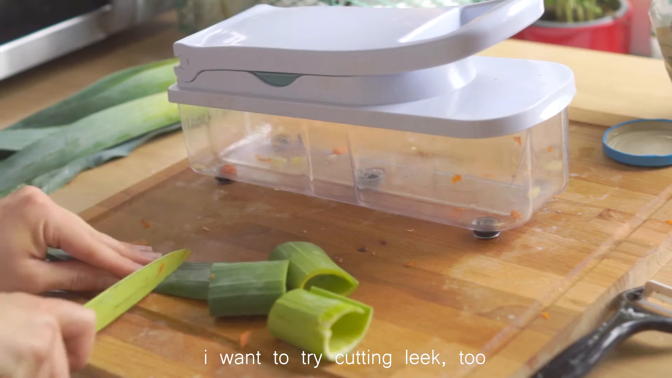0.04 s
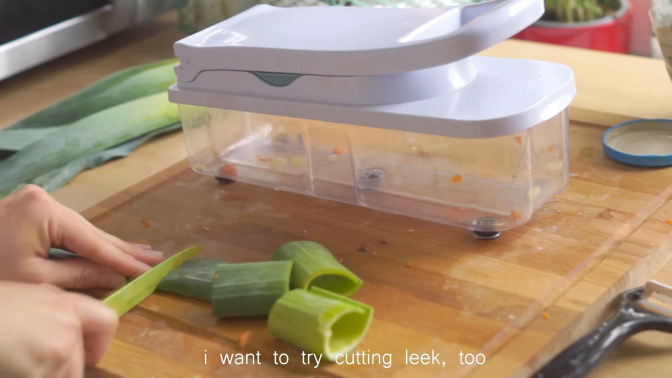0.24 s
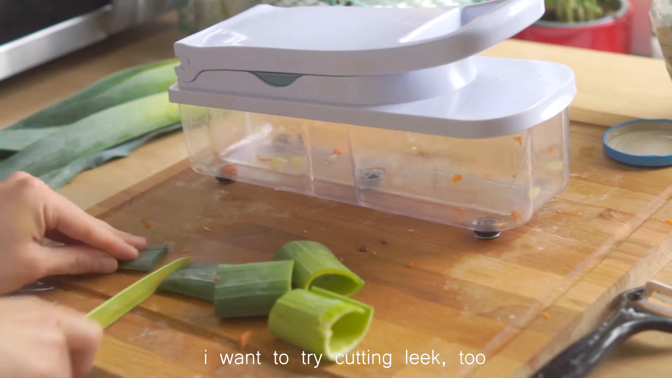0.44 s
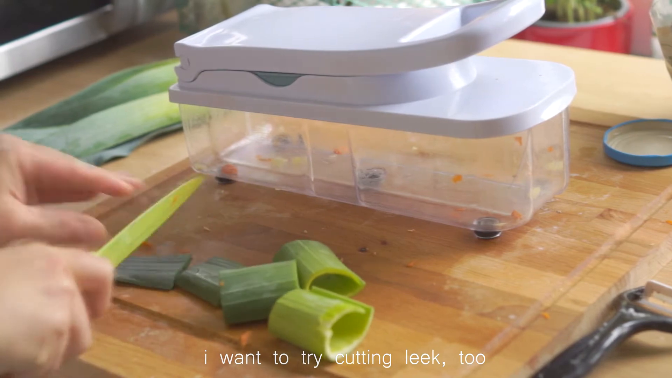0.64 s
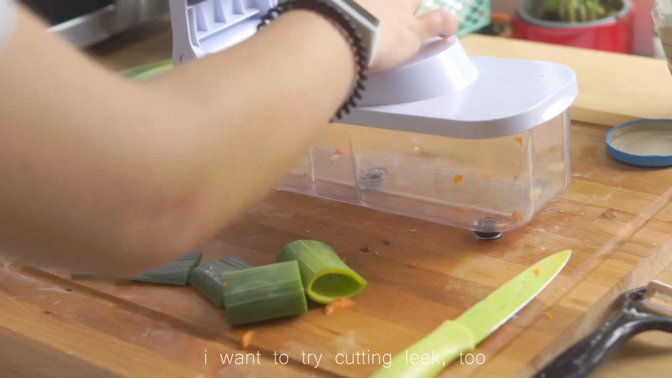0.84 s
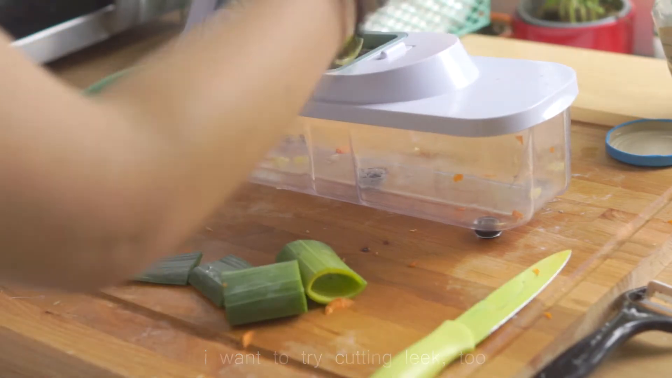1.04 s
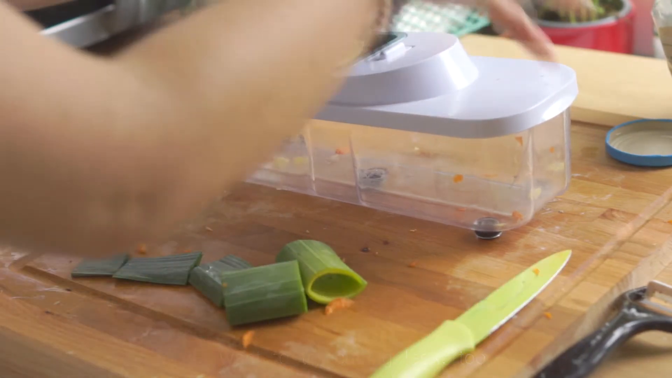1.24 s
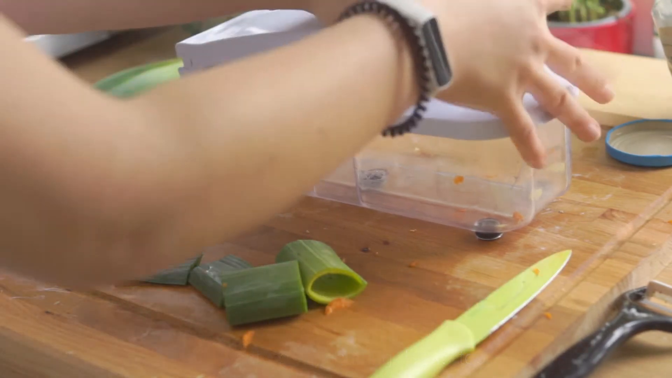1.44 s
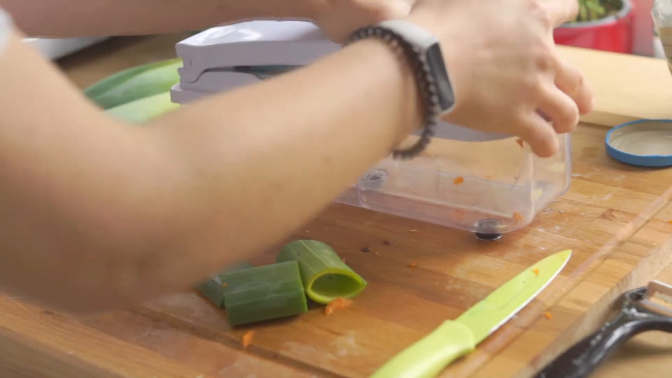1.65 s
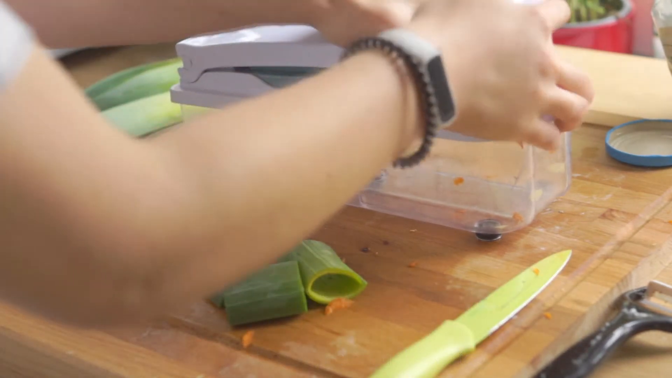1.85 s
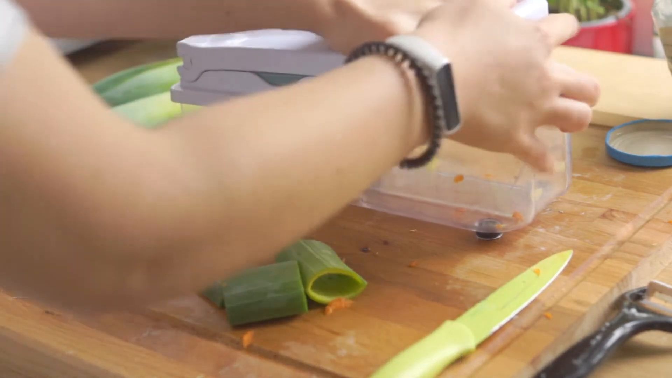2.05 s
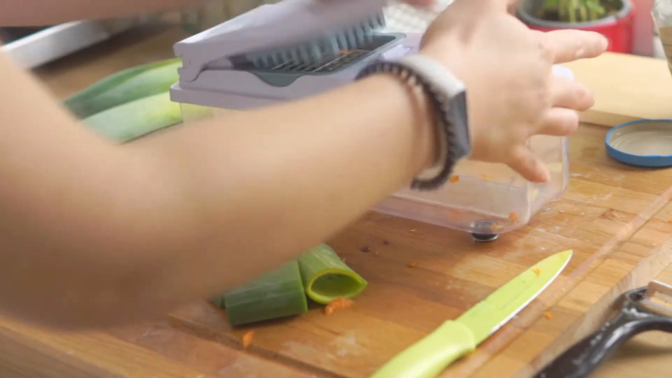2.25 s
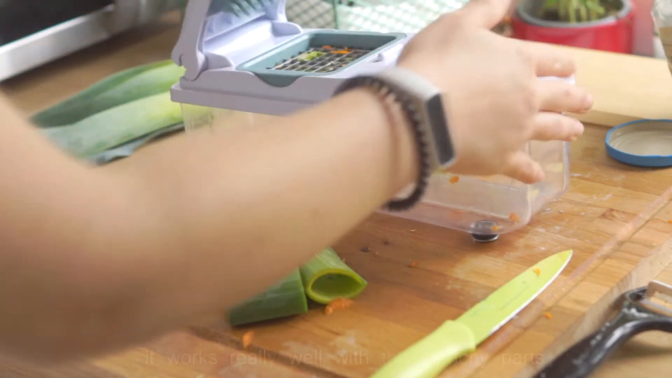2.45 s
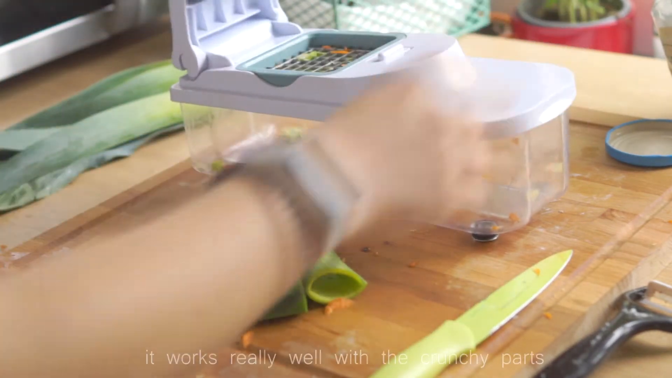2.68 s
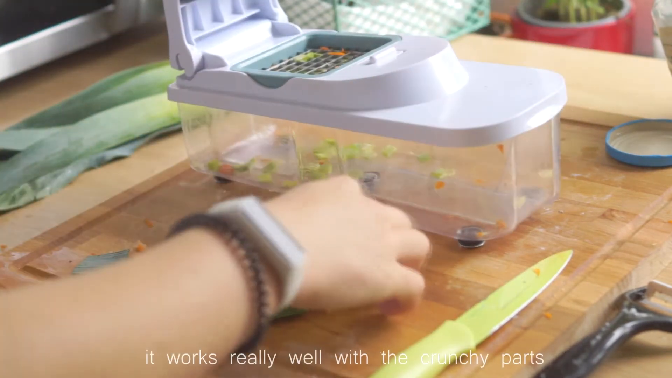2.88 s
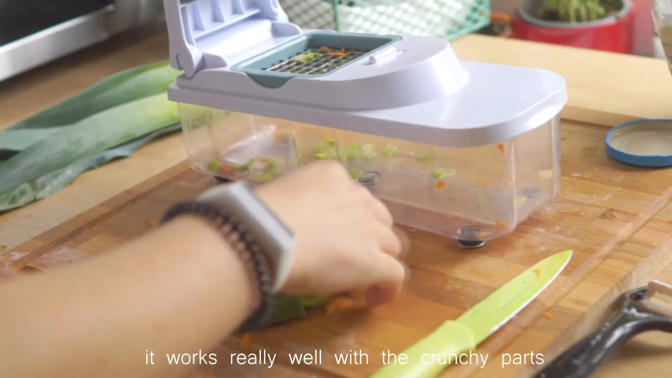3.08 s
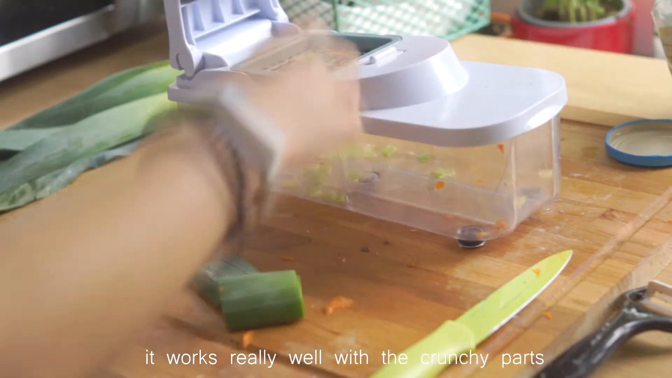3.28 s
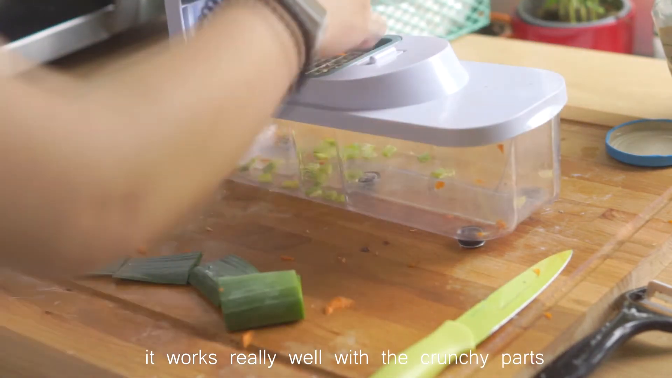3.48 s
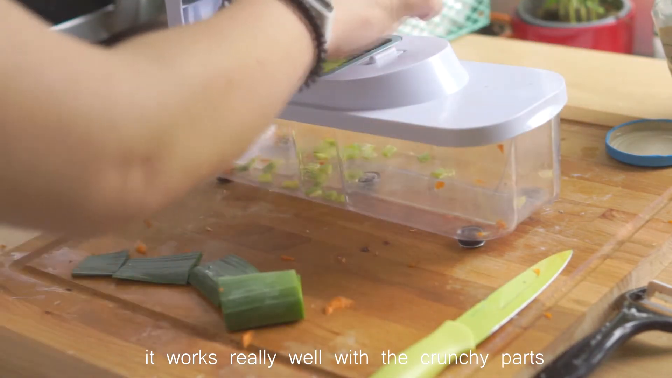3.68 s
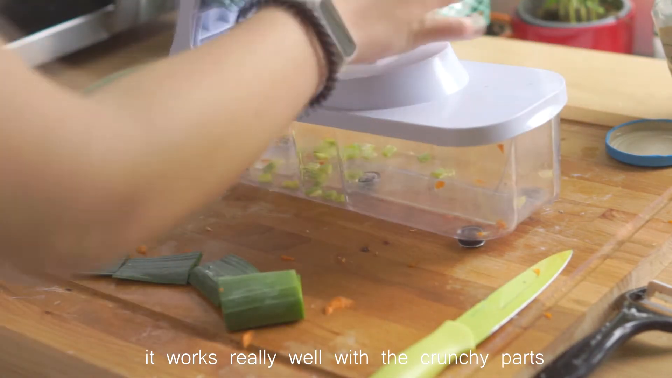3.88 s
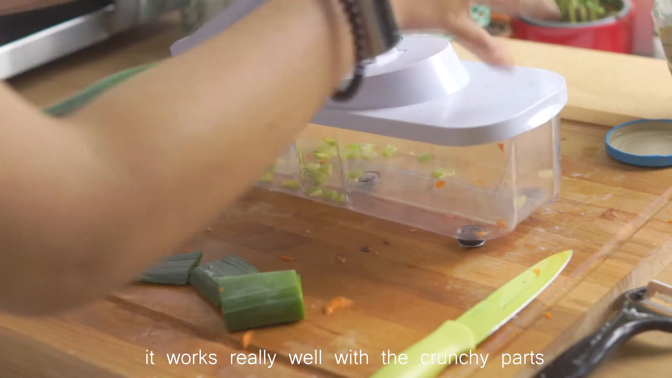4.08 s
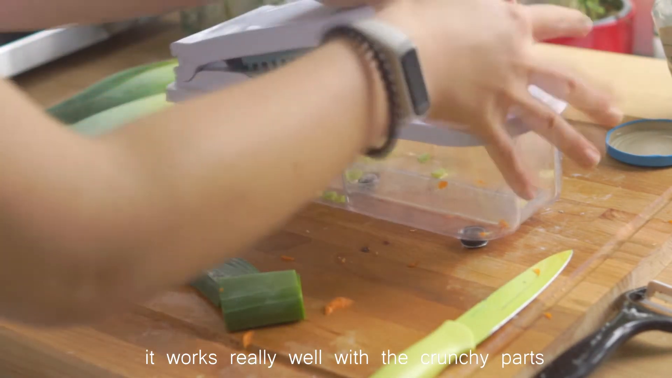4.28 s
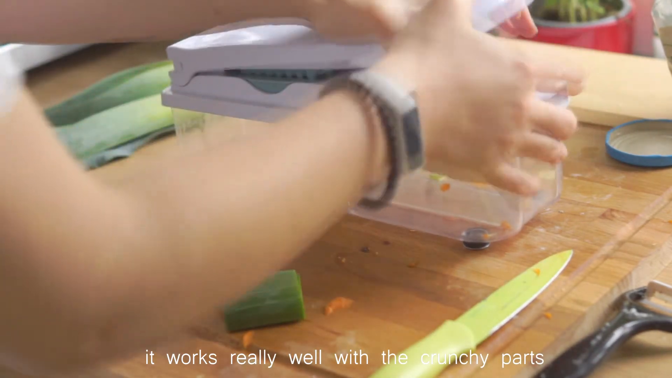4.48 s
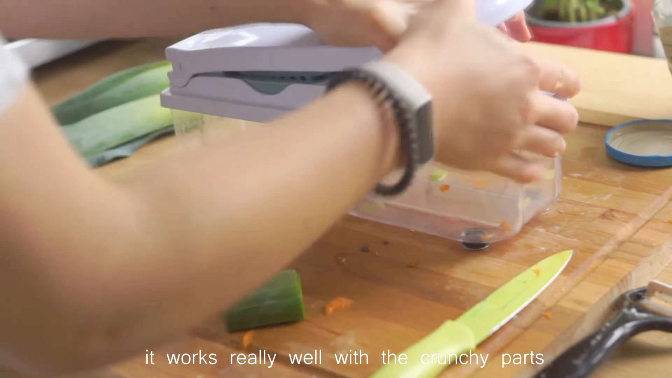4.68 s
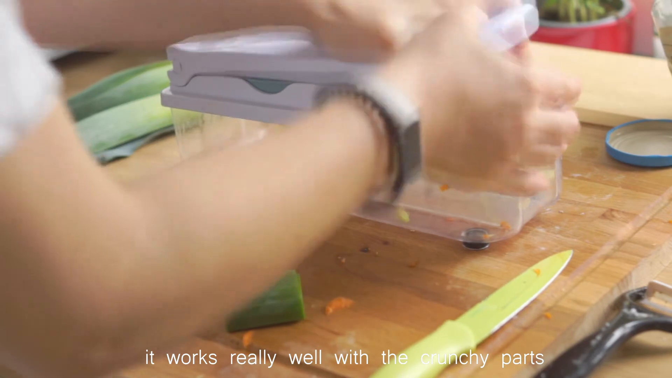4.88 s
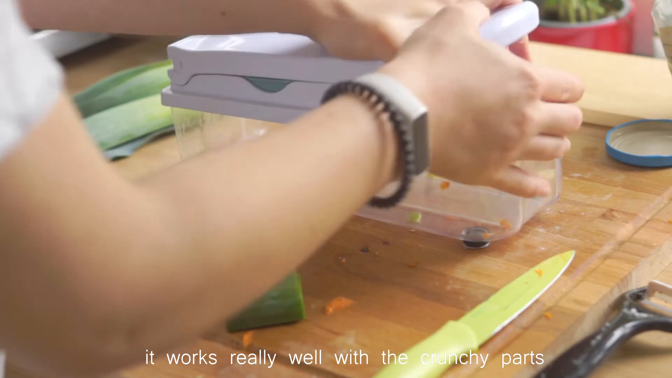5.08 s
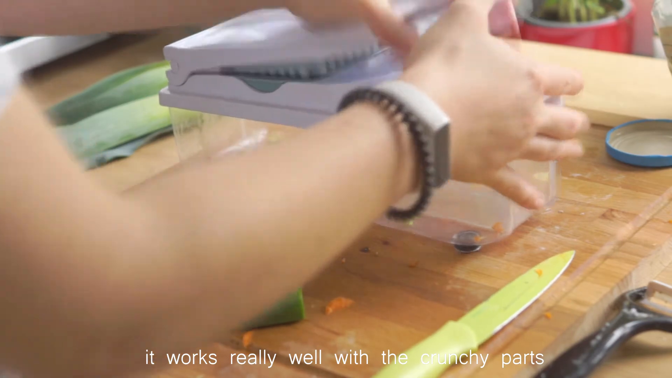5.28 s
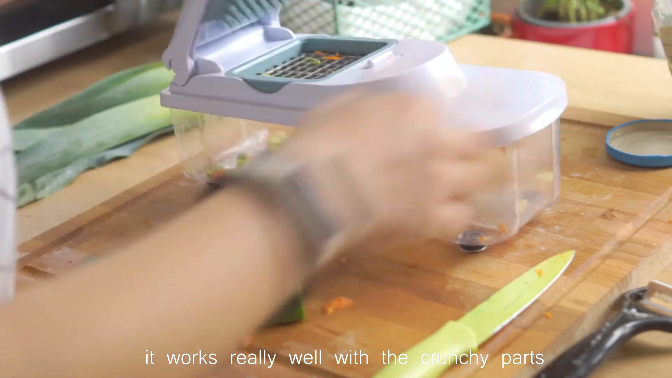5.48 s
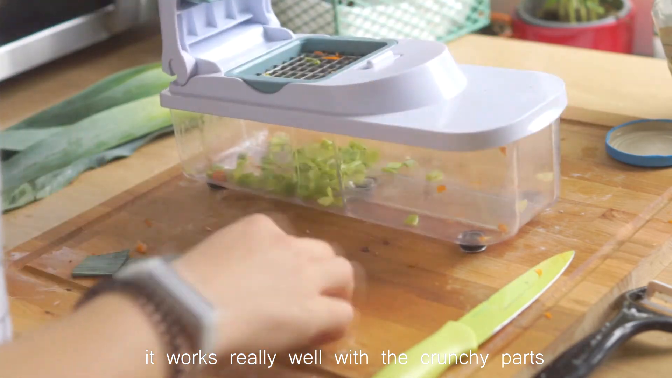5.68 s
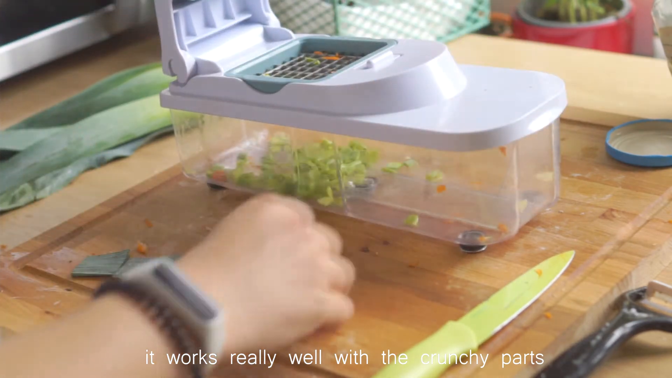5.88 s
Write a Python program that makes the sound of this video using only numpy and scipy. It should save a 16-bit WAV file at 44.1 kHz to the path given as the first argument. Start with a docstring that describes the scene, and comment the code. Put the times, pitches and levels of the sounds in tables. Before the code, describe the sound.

Close stereo pickup of a hollow plastic dicer on a wooden board. A faint leek cut and dry blade scrapes come first, followed by dull handling taps. Twice, leek crackles and bursts under the lid, which stops with a knock, pauses briefly, then slaps shut loudly with chattering plastic and a boom through the wood. Each time it clatters open softly; short kitchen reverberation and low hush remain.

```python
"""Dicing leek in a press-down dicer

In a quiet, fairly live kitchen a knife slices leek: random fibre cracks ring a blade and scrape over wood.
Then, twice, a plastic lid crushes leek in bursts of cracks and is shoved home with a rattling clack;
contact pulses ring the lid and box as resonances and boom through the feet and the wooden board.
Hands bump the dicer in between. Decaying noise makes the room, and soft coloured noise the hush."""
import sys
import numpy as np
from scipy import signal
from scipy.fft import rfft, irfft
from scipy.io import wavfile
from scipy.ndimage import uniform_filter1d

SR = 44100
rng = np.random.default_rng(int(sys.argv[2]) if len(sys.argv) > 2 else 0)


def store_pcm(level_fs):
    """Save levels as 16-bit WAV."""
    pcm = np.round(np.clip(level_fs, -1, 1) * 32767).astype(np.int16)
    wavfile.write(sys.argv[1], SR, np.atleast_2d(pcm).T)


N = 261513  # samples

# Resonances of plastic lid, hollow box, flat slap, board, blade and rubber feet.
# Each row: frequency in Hz, width in Hz, gain in dB.
LID_MODES = [(228.7, 2.7, 12.5), (257.4, 9.9, 18), (336, 17.3, 14), (495.3, 20.5, -4.5), (694, 10.2, 14),
             (983, 79, 11), (1163, 33, 6.5), (1270, 6.7, 11), (1590, 16, 10), (1796, 37, -5.5),
             (2313, 91, -0.5), (2750, 66, -4), (3430, 46, -4)]
BOX_MODES = [(244, 14.4, 9.5), (283, 3.4, -2), (350.2, 13.3, 14.5), (401.2, 8.5, 21.5), (430, 6.3, -2),
             (578, 2.2, -3.5), (720, 27, 5.5), (955, 16, 3), (1090, 40, -8), (1400, 13, 6),
             (2280, 186, 4.5), (3500, 86, -1.5)]
SLAP_MODES = [(940, 570, 2.6)]
BOARD_MODES = [(65, 18, 7), (74, 0.52, -3)]
BLADE_MODES = [(920, 92, 5), (2130, 100, -13), (3150, 340, -3.5)]
FEET_MODES = [(36.7, 41, -25), (113, 10.6, 0.5)]

# Noise colours of crunch, rattle, slice, scrape, tap and room hush.
# Each row: frequency in Hz, relative spectral level in dB.
CRUNCH_SPECTRUM = [(60, -22), (150, -38.5), (240, -1.5), (350, -7), (480, 6.5), (820, -3.5), (1150, 0.5),
                   (1800, -1.5), (2700, -5), (4000, -6), (5200, -8.5), (7000, -10), (10500, -16.5)]
RATTLE_SPECTRUM = [(60, -11.5), (150, -12.5), (260, -4.5), (400, -5.5), (600, -4), (1000, -2), (1450, -4),
                   (1900, -11.5), (2400, -10), (4200, -7), (5500, -13), (8500, -15.5), (11000, -23.5)]
SLICE_SPECTRUM = [(60, -6), (250, -4), (520, -2), (680, 2.5), (1000, -5.5), (1400, -1.5), (2100, -0.5),
                  (3400, -4), (5000, -6), (10500, -9.5)]
SCRAPE_SPECTRUM = [(300, -12), (1200, -6.5), (2000, -0.5), (2500, -1), (3200, -0.5), (4200, -4.5),
                   (6000, -4.5), (10500, -9)]
TAP_SPECTRUM = [(60, -20), (200, -0.5), (400, 2.5), (650, -4.5), (1100, -5), (1600, -12.5), (2600, -23.5),
                (5000, -28.5), (10500, -35)]
HUSH_SPECTRUM = [(15, -46), (25, -10.5), (75, -2), (99, -14.5), (138, -3), (218, -8), (288, -1),
                 (505, -9.5), (668, -12), (721, -12.5), (819, -13.5), (11000, -27.5), (14300, -59),
                 (22000, -120)]

# Decay of the kitchen. Each row: frequency in Hz, time to fall by 60 dB in seconds.
ROOM_DECAY = [(100, 1), (190, 0.47), (380, 0.17), (1000, 0.42), (3000, 0.4052), (7000, 0.31), (11000, 0.06)]
# Reverberation colour. Each row: frequency in Hz, relative level in dB.
ROOM_LEVEL = [(80, -1), (250, -4.5), (420, -3), (800, -3.5), (4000, 0), (10000, 0.5)]
# Stereo width. Each row: frequency in Hz, gain of the side signal in dB.
STEREO_WIDTH = [(60, -13.5), (150, -13.5), (300, -8.5), (1000, -2), (3000, -3.5), (8000, -3.5)]

# All event levels below are relative: sources, filters and room add their own gain.
# Blade scraping over the board. Each row: start in seconds, level in dB, hold in seconds.
BLADE_SCRAPES = [(0.296, -45, 0.001), (.345, -45, 0.0016), (0.382, -50.5, 0.041), (0.491, -52, 0.031),
                 (0.554, -57, 0.038)]
# Single leek fibres parting under the knife or the fingers. Each row: time in seconds, level in dB.
FIBRE_POPS = [(.053, -48), (5.689, -44.5)]
# Knife and leek set down, leek settling on the grid. Each row: time in seconds, level in dB.
SOFT_TAPS = [(0.891, -46.5), (0.961, -52.5), (1.217, -44.5), (1.250, -49), (3.612, -55.5), (3.73, -51),
             (3.921, -57.5), (4.075, -49.5)]
# Thumps on the board: hands leaning on it or letting go, and at 2.252 s the dicer # still rocking after the
# first slam. Each row: time in seconds, level in dB.
BOARD_THUMPS = [(0.096, -39.5), (1.194, -41), (1.364, -36.5), (2.252, -30), (2.878, -43.5), (4.433, -38),
                (5.258, -48)]
# Hands bumping the container. Each row: time in seconds, level in dB, contact speed in Hz.
HAND_BUMPS = [(1.179, -34, 121), (1.215, -32, 400), (1.353, -32, 500), (5.402, -29, 342)]
# Lid squeezing the leek, a steady crackle.
# Each row: time in seconds, level in dB, swell in seconds, hold in seconds.
LEEK_SQUEEZES = [(1.326, -42, 0.0057, .03), (1.517, -31, 0.016, 0.14), (4.279, -49, 0.033, 0.047),
                 (4.411, -30.5, .008, 0.14)]
# Leek layers bursting under the lid. Each row: time in seconds, level in dB, treble tilt in dB.
LEEK_SNAPS = [(1.360, -20, -5.5), (1.382, -14.5, -5.5), (1.415, -20.5, 4.5), (1.507, -20, 19),
              (1.539, -18, 5.5), (1.551, -17.5, 6.5), (1.628, -22, 19), (4.367, -20, 13), (4.378, -15, -27),
              (4.445, -15, 8), (4.468, -16.5, 4), (4.48, -14.5, 15), (4.500, -15.5, -6)]
# Pitch of each piece's crackle.
# Each row: start in seconds, end in seconds, pitch in Hz, width in Hz, gain in dB.
PIECE_PITCHES = [(1.2, 1.85, 2700, 900, 0), (4.2, 4.846, 3650, 1000, -6.5)]
# Lid bottoming on crushed leek.
# Each row: time in seconds, knock level in dB, crush level in dB, thump level in dB.
LID_BOTTOMINGS = [(1.646, -5.5, -19.5, -18), (4.497, -13.5, -21, -17)]
# Lid shoved home, slapping flat onto the grid.
# Each row: time in seconds, slap level in dB, lead of the teeth in seconds.
LID_SLAMS = [(1.8975, 0, 0.013), (4.9126, -.5, 0.0093)]
# Lid swung open against its stop. Each row: time in seconds, level in dB.
LID_OPENINGS = [(2.391, -28.5), (5.472, -27.5)]
# Two bounces after each opening.
# Each row: delay in seconds, level in dB against the opening, contact speed in Hz.
LID_BOUNCES = [(.021, -6, 600), (0.066, -10, 271)]

# Room and listening position
EARLY_T60_S, EARLY_DB, TAIL_DB, DIRECT_DB = 0.03, -2.5, -1, 0.5
SHIELD_HZ, SKIN_HZ = 4860, 1820
BOOM_ROOM_DB = -11
HUSH_DB = -58

# Knife cut and the blade's dull landing
CUT_AT_S, CUT_DB, CUT_SWELL_S, CUT_FADE_S = 0.094, -35, 0.011, 0.018
LANDING_AFTER_S, LANDING_DB, LANDING_TREBLE_DB = 0.018, -35.5, -24
TREBLE_HZ = 1800  # split between the dull and bright part of a burst

# Crushing; each snap also jolts the lid, and juice dulls the top of the crackle
SQUEEZE_FADE_S, SQUEEZE_TREBLE_DB = 0.065, 1
SNAP_SWELL_S, SNAP_FADE_S = 0.0035, 0.0053
SNAP_KICK_DB, SNAP_KICK_HZ = -12.5, 503
WET_LEEK_HZ = 7540
STOP_HZ, STOP_BOUNCE_S, STOP_BOUNCE_DB = 320, 0.056, -7
STOP_CRUSH_FADE_S, STOP_TREBLE_DB = 0.016, -19

# Slam; levels are added to the slap level, treble excepted
SLAP_HZ = 1515
ENTRY_DB, ENTRY_TREBLE_DB = -29.5, 20
CLACK_AFTER_S, CLACK_DB, CLACK_FADE_S = 0.0055, -15.5, 0.0098
RATTLE_AFTER_S, RATTLE_DB, RATTLE_TREBLE_DB = 0.026, -23.5, -4.5
RATTLE_HOLD_S, RATTLE_FADE_S = 0.055, 0.056
CHATTER_S, CHATTER_DB, CHATTER_GROWS_DB, CHATTER_HZ = 0.023, -17.5, 1.9, 410
REBOUND_S, REBOUND_DB, REBOUND_HZ = 0.168, -23.5, 327
THUMP_HZ = 70
SLAM_THUMP_AFTER_S, SLAM_THUMP_DB = 0.0073, -13.5
ROCK_S, ROCK_DB, ROCK_HZ = 0.113, -36.5, 60

# Lid opening; the hinge clicks first
OPEN_HZ = 252.6
HINGE_LEAD_S, HINGE_DB, HINGE_HZ = 0.021, -7, 1350


def from_db(db):
    """Turn decibels into an amplitude factor."""
    return 10 ** (np.asarray(db) / 20)


def rms_one(x):
    """Scale a signal to unit RMS."""
    return x / np.sqrt(np.mean(x ** 2) + 1e-20)


def at_hz(points, hz):
    """Read a spectrum on a log-frequency axis."""
    f, value = np.transpose(points)
    return np.interp(np.log(np.maximum(hz, 1)), np.log(f), value)


def butter(x, hz, kind, order=2):
    """Plain causal filter."""
    sections = signal.butter(order, hz, kind, fs=SR, output="sos")
    return signal.sosfilt(sections, x + 1e-18)


def coloured(x, spectrum, size=4096):
    """Causal (minimum-phase) filter with the given spectrum; white input keeps its power."""
    levels = at_hz(spectrum, np.fft.rfftfreq(size, 1 / SR))
    cepstrum = irfft(np.log(from_db(levels)))
    # Folding the cepstrum forward makes the response minimum-phase.
    cepstrum[1:size // 2] *= 2
    cepstrum[size // 2 + 1:] = 0
    response = irfft(np.exp(rfft(cepstrum)))
    return signal.fftconvolve(x, response / np.linalg.norm(response))[:N]


def ring(x, modes):
    """Parallel damped resonances, each with its own gain on top."""
    out = np.zeros(N)
    for hz, width, db in modes:
        r = np.exp(-np.pi * width / SR)
        poles = [1, -2 * r * np.cos(2 * np.pi * hz / SR), r * r]
        gain = from_db(db) * (1 - r * r) / 2
        out += gain * signal.lfilter([1, 0, -1], poles, x + 1e-18)
    return out


def pushes(rows):
    """One force pulse per contact: the slower the contact, the longer and duller."""
    out = np.zeros(N)
    for s, db, hz in rows:
        at = round(s * SR)
        age = 2 * np.pi * hz * np.arange(min(SR // 10, N - at)) / SR
        out[at:at + len(age)] += from_db(db) * age * np.exp(1 - age)
    return out


def burst(s, db, swell_s, fade_s, hold_s=0, treble_db=0):
    """Power over time of one burst (swell, hold, fade), and its treble gain."""
    age = np.arange(N) / SR - s
    slope = np.minimum(age / swell_s, (hold_s - age) / fade_s)
    power = from_db(db) ** 2 * np.exp(2 * np.clip(slope, -20, 0))
    return power, from_db(treble_db)


def cracks(bursts, colour, per_s, spread_db):
    """Tiny random fractures, released in bursts that each have their own brightness."""
    sizes = from_db(spread_db * np.minimum(rng.exponential(1, N), 4))
    sizes = sizes * rng.choice([-1, 1], N)
    clicks = sizes * (rng.random(N) < per_s / SR)
    # The hand feeds in energy steadily.
    clicks /= np.sqrt(np.abs(uniform_filter1d(clicks ** 2, size=600)) + 1e-4)
    grains = coloured(clicks, colour)
    dull = butter(grains, TREBLE_HZ, "low", order=1)
    bright = grains - dull
    bright_share = np.clip(np.var(bright) / np.var(grains), 0, 1)
    dull_power, bright_power = np.zeros(N), np.zeros(N)
    for power, treble in bursts:
        # Brightness tilts a burst while its total power is evened out.
        evened = power / (1 - bright_share + bright_share * treble ** 2)
        dull_power += evened
        bright_power += evened * treble ** 2
    return np.sqrt(dull_power) * dull + np.sqrt(bright_power) * bright


def spread(mid, side):
    """Two close microphones: alike in the bass, unrelated in the treble."""
    width = from_db(at_hz(STEREO_WIDTH, np.fft.rfftfreq(len(side), 1 / SR)))
    side = irfft(rfft(side) * width, len(side))
    return np.array([mid + side, mid - side])


def echoes():
    """Quick reflections off board and counter, then a tail that decays at its own rate in each band."""
    t, hz = np.arange(SR) / SR, np.fft.rfftfreq(SR, 1 / SR)
    scatter = rfft(spread(rng.standard_normal(SR), rng.standard_normal(SR)))
    edges = np.geomspace(40, 13000, num=18)
    response = np.zeros((2, SR))
    for low, high in zip(edges, edges[1:]):
        centre = np.sqrt(low * high)
        band = irfft(scatter * ((hz >= low) & (hz < high)), SR)
        early = (EARLY_T60_S, EARLY_DB, 0.002)
        tail = (at_hz(ROOM_DECAY, centre), TAIL_DB, 0.012)
        for t60, db, delay in [early, tail]:
            onset = 1 - np.exp(-(t / delay) ** 2)
            part = band * from_db(-60 * t / t60) * onset
            energy = np.sum(part.mean(axis=0) ** 2) * SR / (2 * (high - low))
            response += part / np.sqrt(energy) * from_db(db + at_hz(ROOM_LEVEL, centre))
    return response


def in_room(x):
    """Convolve a source with a fresh set of stereo room echoes."""
    return signal.fftconvolve(x[None], echoes(), axes=1)[:, :N]


def kitchen(x, count=4):
    """Arm and lid shield the direct sound; a wandering contact point reaches the room by changing paths."""
    paths = np.array([butter(noise, 18.75, "low") for noise in rng.standard_normal((count, N))])
    paths /= np.sqrt(np.sum(paths ** 2, axis=0)) + 1e-12
    room = sum(in_room(x * path) for path in paths)
    direct = from_db(DIRECT_DB) * butter(x, SHIELD_HZ, "low", order=1)
    # The right microphone is a little farther away: one sample.
    return np.array([direct, np.roll(direct, 1)]) + room


def hush():
    """Steady low room noise with a little hiss, made of coloured random noise."""
    mid, side = (rms_one(coloured(noise, HUSH_SPECTRUM)) for noise in rng.standard_normal((2, N)))
    return from_db(HUSH_DB) * spread(mid, from_db(6.0) * side)


def knife():
    """The blade tears through wet fibres, lands and scrapes over the wood, ringing faintly."""
    cut = burst(CUT_AT_S, CUT_DB, CUT_SWELL_S, CUT_FADE_S, treble_db=5)
    landing = burst(CUT_AT_S + LANDING_AFTER_S, LANDING_DB,
                    swell_s=0.006, fade_s=0.02, treble_db=LANDING_TREBLE_DB)
    ticks = [burst(s, db, swell_s=0.0032, fade_s=0.0052, treble_db=11) for s, db in FIBRE_POPS]
    scrapes = [burst(s, db, swell_s=0.0011, fade_s=0.017, hold_s=hold) for s, db, hold in BLADE_SCRAPES]
    slicing = cracks([cut, landing] + ticks, SLICE_SPECTRUM, per_s=1600, spread_db=3.0)
    scraping = cracks(scrapes, SCRAPE_SPECTRUM, per_s=2100, spread_db=8.0)
    force = from_db(1.0) * slicing + from_db(-1.5) * scraping
    return force + ring(force, BLADE_MODES)


def board(count=2):
    """The dicer rocks on rubber feet; the board passes thumps on as a swelling boom that lingers in the room."""
    thumps = [(s, db, THUMP_HZ) for s, db in BOARD_THUMPS]
    thumps += [(s, db, THUMP_HZ) for s, _, _, db in LID_BOTTOMINGS]
    for s, db, _ in LID_SLAMS:
        landing = s + SLAM_THUMP_AFTER_S
        thumps.append((landing, db + SLAM_THUMP_DB, THUMP_HZ))
        thumps += [(landing + ROCK_S * (k + 1), db + ROCK_DB, ROCK_HZ) for k in range(count)]
    force = pushes(thumps)
    # Two resonators in a row make the boom swell.
    passed_on = ring(force, [(69.2, 7.5, 5.65)])
    boom = ring(force, FEET_MODES) + ring(passed_on, BOARD_MODES)
    return boom + from_db(BOOM_ROOM_DB) * in_room(boom)


def taps():
    """Light things put down touch at many points and give a soft, dull patter."""
    bursts = [burst(s, db, swell_s=0.0062, fade_s=0.031) for s, db in SOFT_TAPS]
    return cracks(bursts, TAP_SPECTRUM, per_s=1400, spread_db=0.0)


def box_knocks(count=4):
    """Contacts on the container: hand bumps, uneven chatter and a rebound after a slam, the lid swinging open."""
    knocks = list(HAND_BUMPS)
    all_slips = rng.normal(0, 0.062, (len(LID_SLAMS), count))  # in chatter intervals
    for (s, db, _), slips in zip(LID_SLAMS, all_slips):
        # The lid knocks on the rim as the hand bears down, then springs back.
        for k, slip in enumerate(slips):
            level = db + CHATTER_DB + CHATTER_GROWS_DB * k
            knocks.append((s + CHATTER_S * (k + 1 + slip), level, CHATTER_HZ))
        knocks.append((s + REBOUND_S, db + REBOUND_DB, REBOUND_HZ))
    for s, db in LID_OPENINGS:
        knocks.append((s - HINGE_LEAD_S, db + HINGE_DB, HINGE_HZ))
        knocks.append((s, db, OPEN_HZ))
        knocks += [(s + delay, db + bounce_db, hz) for delay, bounce_db, hz in LID_BOUNCES]
    return pushes(knocks)


def teeth():
    """At each slam the lid's teeth enter the blade grid, clack home and rattle on."""
    bursts = []
    for s, db, lead in LID_SLAMS:
        entry = burst(s - lead, db + ENTRY_DB, swell_s=0.0043, fade_s=0.012, treble_db=ENTRY_TREBLE_DB)
        clack = burst(s + CLACK_AFTER_S, db + CLACK_DB, swell_s=0.0029, fade_s=CLACK_FADE_S, treble_db=-1.5)
        rattle = burst(s + RATTLE_AFTER_S, db + RATTLE_DB, swell_s=0.011, fade_s=RATTLE_FADE_S,
                       hold_s=RATTLE_HOLD_S, treble_db=RATTLE_TREBLE_DB)
        bursts += [entry, clack, rattle]
    return from_db(0.5) * cracks(bursts, RATTLE_SPECTRUM, per_s=2000, spread_db=2.0)


def box():
    """Rattling teeth and padded knocks set the hollow container ringing; the flat slap adds a short bark."""
    knocks = butter(box_knocks(), 320, "high", order=3)
    padded = butter(knocks, SKIN_HZ, "low", order=4)
    force = teeth() + from_db(1.5) * padded
    slaps = pushes([(s, db, SLAP_HZ) for s, db, _ in LID_SLAMS])
    return force + ring(force, BOX_MODES) + ring(slaps, SLAP_MODES)


def lid():
    """Leek crackles and snaps against the lid until the lid bottoms and bounces; its plastic rings along."""
    bursts = [burst(s, db, swell, SQUEEZE_FADE_S, hold, SQUEEZE_TREBLE_DB)
              for s, db, swell, hold in LEEK_SQUEEZES]
    knocks = []
    for s, db, treble_db in LEEK_SNAPS:
        bursts.append(burst(s, db, SNAP_SWELL_S, SNAP_FADE_S, treble_db=treble_db))
        knocks.append((s, db + SNAP_KICK_DB, SNAP_KICK_HZ))
    for s, db, crush_db, _ in LID_BOTTOMINGS:
        bursts.append(burst(s, crush_db, swell_s=0.002, fade_s=STOP_CRUSH_FADE_S,
                            hold_s=0.0023, treble_db=STOP_TREBLE_DB))
        knocks.append((s, db, STOP_HZ))
        knocks.append((s + STOP_BOUNCE_S, db + STOP_BOUNCE_DB, STOP_HZ))
    crackle = cracks(bursts, CRUNCH_SPECTRUM, per_s=1700, spread_db=4.5)
    crackle = from_db(-2.5) * butter(crackle, WET_LEEK_HZ, "low", order=1)
    t = np.arange(N) / SR
    force = crackle.copy()
    for start, end, *mode in PIECE_PITCHES:
        force += ring(crackle * (t > start) * (t < end), [mode])
    force += butter(butter(pushes(knocks), 250, "high", order=4), SKIN_HZ, "low")
    return force + ring(force, LID_MODES)


def scene():
    """The dicer stands in front of the microphones; the boom leans to the left."""
    dicing = kitchen(knife() + taps() + box() + lid()) * from_db([[-0.2], [0.2]])
    return hush() + dicing + board() * from_db([[1.1], [-1.1]])


def record(dry):
    """The highest peaks are rounded and the top is cut steeply."""
    rounded = 0.89 * np.tanh(dry / 0.91)
    steep_cut = signal.ellip(12, 0.2, 80, 11080, fs=SR, output="sos")  # low-pass edge in Hz
    return signal.sosfilt(steep_cut, rounded)


dry = scene()
out = record(dry)
store_pcm(out)
```